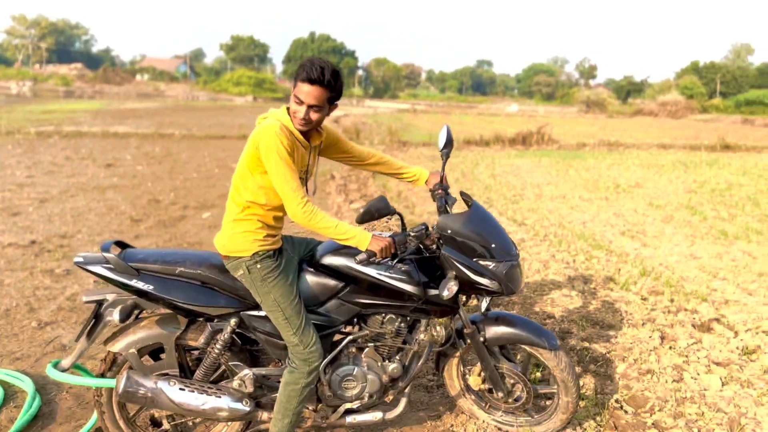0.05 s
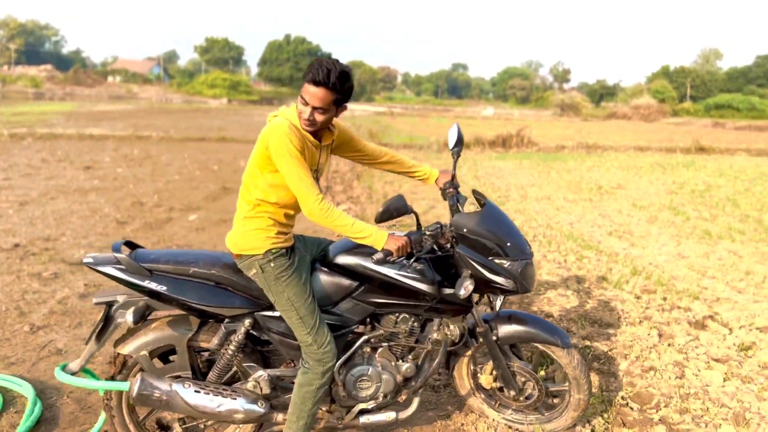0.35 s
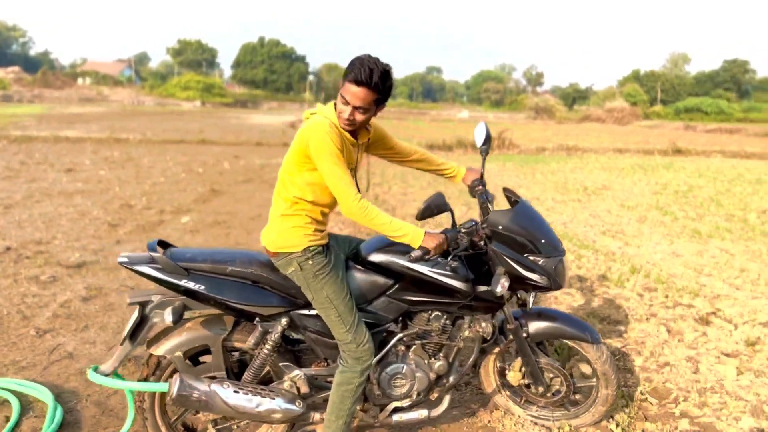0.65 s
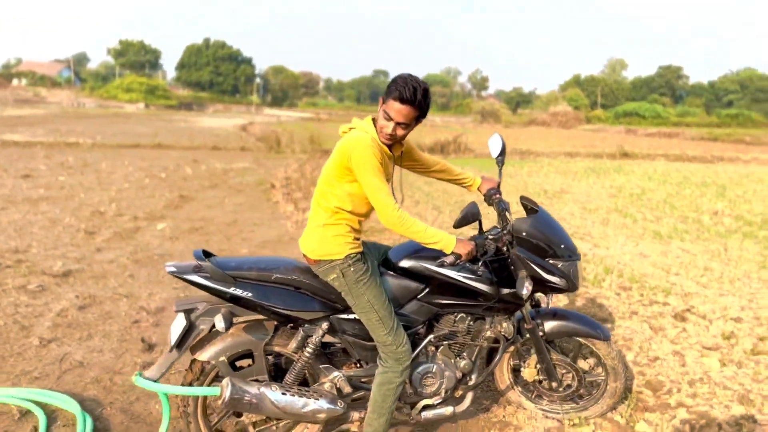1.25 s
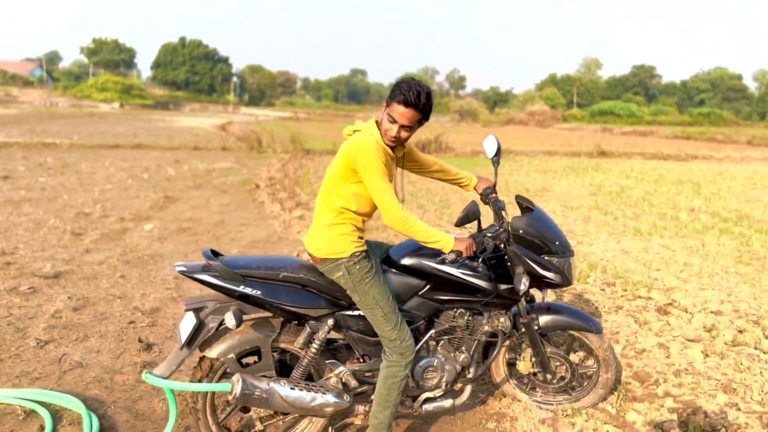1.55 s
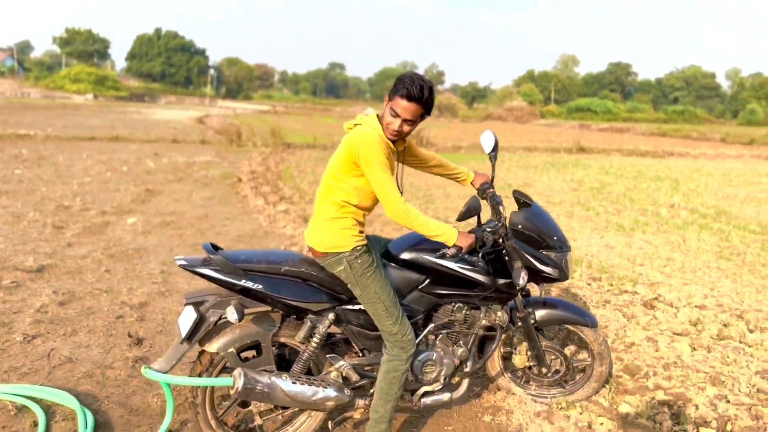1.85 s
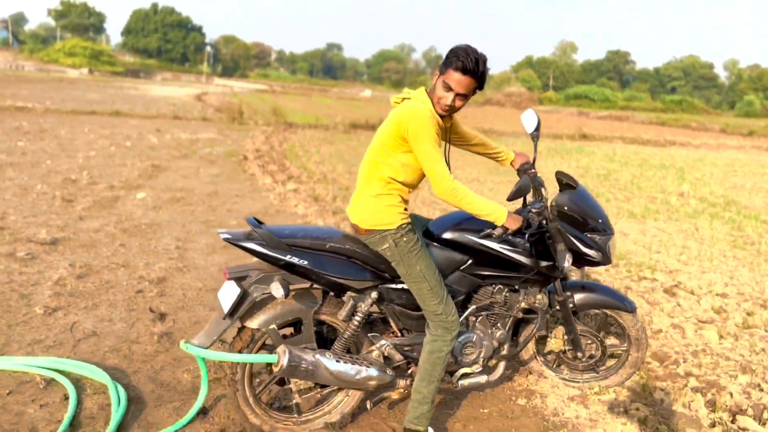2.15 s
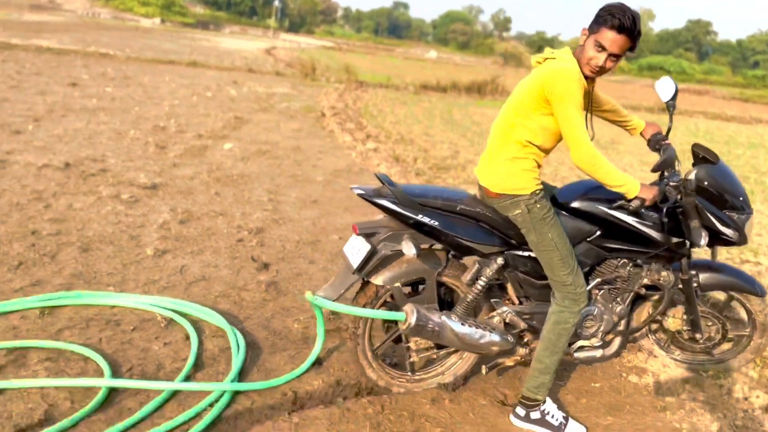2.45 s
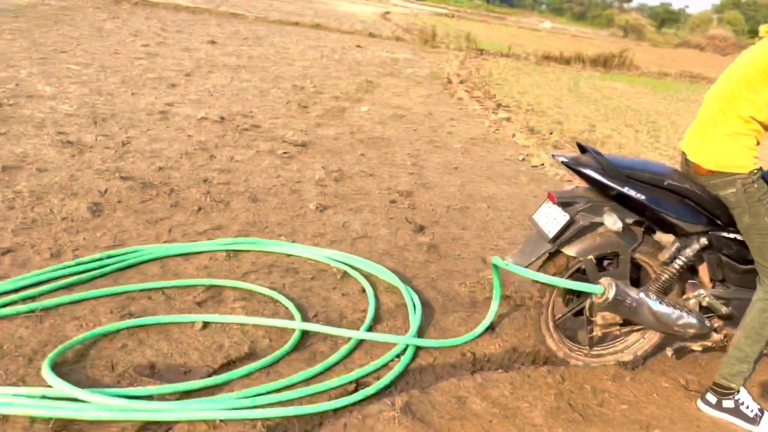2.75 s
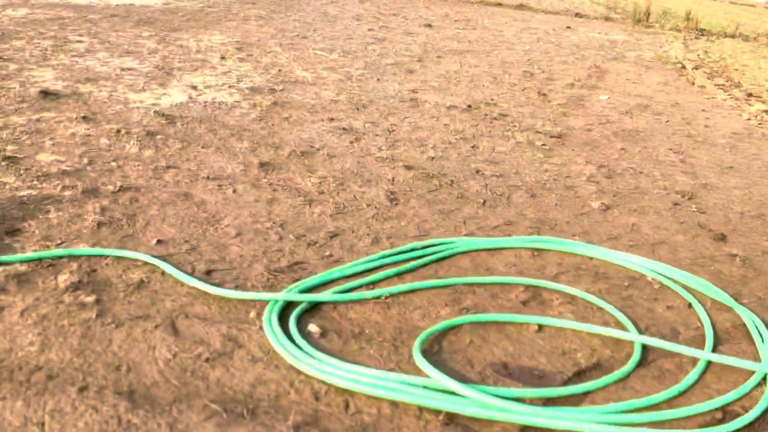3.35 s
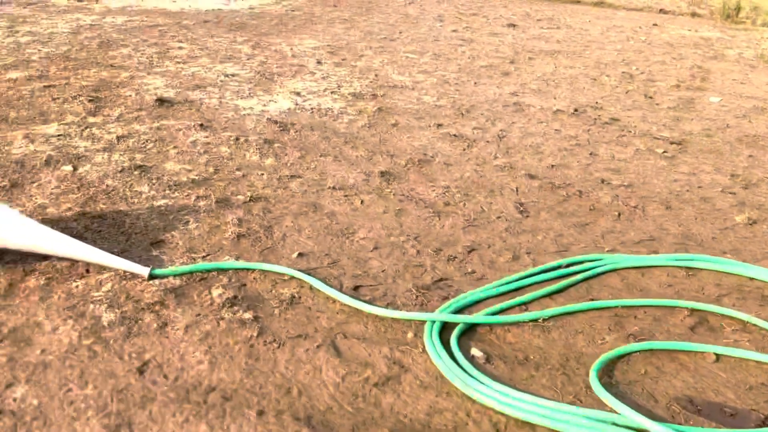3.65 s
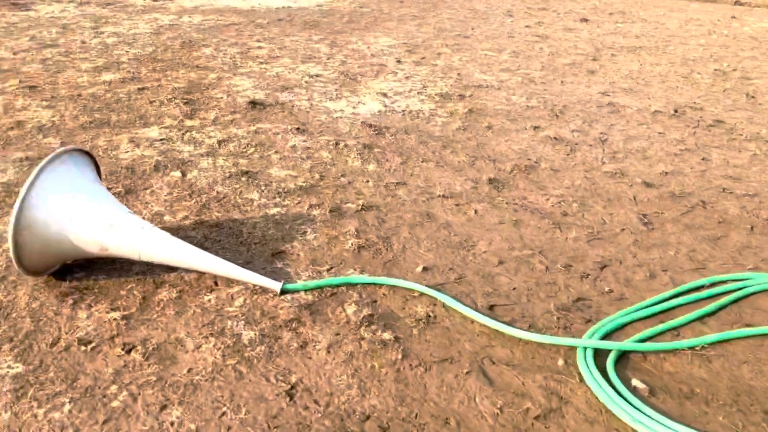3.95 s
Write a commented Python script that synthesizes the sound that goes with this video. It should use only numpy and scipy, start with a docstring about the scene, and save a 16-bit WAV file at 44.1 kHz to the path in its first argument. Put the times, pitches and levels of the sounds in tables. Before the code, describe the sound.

A motorcycle engine runs with uneven pops and low booms, its exhaust piped through a hose.

```python
"""Motorcycle through a garden hose

A single-cylinder engine runs in an open field, its exhaust led through a hose into a horn.
The strokes come out as low booms and falling chirps; throttle blips bring a gulp of air and a
loud pop while the revs sag. On top, the engine clatters, whines, ticks and rings. After 2.4 s
we turn towards the horn, and the clatter slips from beside us to behind us.
Near the end a hollow whistle falls through the hiss."""
import sys
import numpy as np
from scipy import signal
from scipy.fft import rfft, irfft
from scipy.io import wavfile

SR = 44100
rng = np.random.default_rng(int(sys.argv[2]) if len(sys.argv) > 2 else 0)


def inscribe(sig):
    """Save sig as 16-bit PCM at rate SR to the path in sys.argv[1].

    A 1-D sig is mono; a 2-D sig holds one channel per row.
    Samples are clipped to [-1, 1] before scaling.
    """
    pcm = np.round(np.clip(np.atleast_2d(sig).T, -1, 1) * 32767)
    wavfile.write(sys.argv[1], SR, pcm.astype(np.int16))


N = 176400
TIME = np.arange(N) / SR
FREQS = np.maximum(np.fft.rfftfreq(N, 1 / SR), 1)

# engine revs: t/s, cycle rate/Hz
REVS = [(0, 26.8), (.12, 24.6), (.45, 21.4), (.62, 20.1), (.69, 23.3), (.85, 20.8), (1.15, 20.6),
        (1.55, 19.3), (2.1, 18.2), (2.8, 16.5), (4, 16.5)]
# strokes that fire hard: t/s, level/dB
POPS = [(.036, -9), (0.11, -2), (0.191, -7.5), (0.276, -10), (.394, -10), (0.62, -10), (.727, -14),
        (0.761, -1.5), (1.196, -0.5), (1.604, -1.5), (1.858, -12), (1.965, -4.5), (2.011, -2.5),
        (2.379, -1.5), (2.824, -1.5), (3.234, -1.5), (3.591, -4), (3.959, -21)]
# level ride of the soft strokes between them: t/s, level/dB
SOFT_CHIRP_RIDE = [(0, -20.5), (1.5, -18), (2.5, -19), (3, -27), (4, -45)]
# big booms from the horn: peak t/s, level/dB
BOOMS = [(0, -11.5), (.03, -9.5), (.107, -9.5), (.225, -6), (.355, -7), (.49, -8.5), (.7, -6.5), (.765, -6),
         (.808, -7.5), (.855, -5), (.908, -5.5), (1.095, -9.5), (1.155, -9), (1.21, -11.5), (1.26, -5),
         (1.357, -12), (1.562, -3.5), (1.62, -10), (1.669, -6.5), (1.927, -6), (1.973, -4), (2.026, -6),
         (2.08, -5.5), (2.276, -9), (2.342, -5.5), (2.4, -4.5), (2.453, -4), (2.606, -7.5), (2.789, -3.5),
         (2.854, -4.5), (2.908, -6.5), (3.073, -12), (3.206, -5), (3.265, -9.5), (3.49, -11.5),
         (3.558, -7.5), (3.62, -5), (3.948, -9.5)]
# level ride of the soft booms between them: t/s, level/dB
SOFT_BOOM_RIDE = [(.25, -6), (.5, -13), (1.8, -14), (2.6, -11)]
# upper hose resonances: f/Hz, level/dB, rise/s
HOSE_MODES = [(239.3, -27.5, 0.0131), (346.6, -33.5, 0.01824), (567, -46, 0.022)]
# low resonances of hose and horn: f/Hz, level against the boom/dB, rise/s
HORN_MODES = [(70, -14, 0.037), (102.7, -2, 0.023)]
# throttle blips: t/s, rumble push/steps, clatter lift/dB, chuff level/dB
BLIPS = [(0.03, 7.5, -0.5, -22), (0.683, 7.5, 4, -18), (1.116, 8, 3.5, -20), (1.523, 4, 5.5, -25),
         (1.886, 3.5, 7, -34), (2.3, 8, 4.5, -23.5), (2.754, 10, 2, -34), (3.158, 6, 9, -60),
         (3.52, 8, 10.5, -54), (3.957, 10.5, 9.5, -34)]
# tone of the gas rumble: f/Hz, relative level/dB
RUMBLE_EQ = [(20, -22), (38, 10.5), (65, 1.5), (110, 12), (180, 5), (330, -3.5), (550, -16), (1400, -106)]
# clatter rides, beside and behind us: t/s, level/dB
BESIDE_RIDE = [(0, -21.5), (.3, -25), (.55, -27), (.85, -28.5), (1.05, -31), (1.8, -32), (2.1, -30),
               (2.45, -32), (2.8, -36.5), (3.1, -47.5), (4, -67)]
BEHIND_RIDE = [(0, -63), (2.3, -48), (2.8, -36.5), (3.3, -40), (3.8, -41.5), (4, -38.5)]
# clatter tone from each side: f/Hz, relative level/dB
BESIDE_EQ = [(200, 4), (500, 4.5), (850, -3), (1200, 1), (1600, -1), (1850, -4.5), (2900, -5), (3500, -6.5),
             (5200, -12.5), (9800, -21.5), (14000, -23.5)]
BEHIND_EQ = [(450, -0.5), (800, 3), (1550, 1.5), (1850, -7), (2400, -5), (3300, -3.5), (5200, -11),
             (8000, -15.5), (14000, -19)]
# stereo image from each side: f/Hz, left over right/dB, left lead/rad, coherence/0-1
BESIDE_IMAGE = [(500, -1, .5, .75), (740, -8, -.1, .8), (1000, -3, .5, .85), (1560, -5, .7, .88),
                (1710, 1, 0, .85), (2200, -4, .3, .92), (2900, 1, 1.2, .87), (4300, 4, .3, .85),
                (5500, 1, -1, .5), (8400, 0, -3.1, .9), (11500, 0, -6.3, .9)]
BEHIND_IMAGE = [(480, 0, 0, .7), (700, -3, -2.3, .7), (1000, -7, -2.5, .75), (1560, -5, -2.6, .8),
                (1800, 4, -2.5, .4), (3500, 0, -4.9, .75), (6000, 0, -7, .6), (8400, 0, -9.4, .9),
                (11500, 0, -12.6, .9)]
# engine case resonances: f/Hz, width/Hz, lift/dB
CASE_MODES = [(1348, 14, 4), (1494, 23, 5.5), (2080, 160, 3.5), (2780, 87, 4), (6600, 840, 4)]
# gear whine: multiple of the cycle rate, level against the clatter at mean revs/dB
GEAR_PARTIALS = [(54, -18), (86, -18), (121, -16)]
# tone of the intake chuff: f/Hz, relative level/dB
CHUFF_EQ = [(300, 10.5), (1200, 3), (2800, 2.5), (5000, -10), (13000, -15)]
# sharp metal ticks: t/s, level/dB, decay/s
TICKS = [(0.041, -19.5, 0.0051), (0.695, -26, 0.0043), (0.749, -21.5, 0.0037), (0.929, -25.5, 0.0029),
         (1.234, -24, 0.0048), (1.946, -24.5, 0.0089), (2.758, -27.5, 0.01), (3.523, -33, 0.007)]
# tone of the ticks: f/Hz, relative level/dB
TICK_EQ = [(400, 11), (1200, -3.5), (6900, 0.5), (15000, -4)]
# rough rings and, in the last row, a hollow falling whistle:
# peak t/s, half-length/s, f/Hz, glide/(Hz/s), width/Hz, level/dB
RINGS_AND_WHISTLE = [(.29, .13, 1820, -100, 35, -31.5), (.66, .05, 1315, 0, 15, -36),
                     (1.6, .8, 2190, -20, 100, -39.5), (1.5, .9, 4330, -100, 140, -46.5),
                     (1.2, .7, 2880, -60, 70, -42), (3.35, .35, 3550, -750, 300, -48)]


def from_db(db):
    """Decibels to gain."""
    return 10 ** (np.asarray(db) / 20)


def rms_one(x):
    """Scale to rms 1."""
    return x / np.sqrt(np.mean(x ** 2) + 1e-20)


def in_time(rows):
    """A control curve at every sample."""
    return np.interp(TIME, *np.transpose(rows))


def over_hz(rows):
    """Each column of a table at every frequency."""
    hz, *columns = np.transpose(rows)
    return [np.interp(np.log(FREQS), np.log(hz), c) for c in columns]


def noise(gain):
    """Noise with the given gain per frequency; rms 1."""
    return rms_one(irfft(rfft(rng.standard_normal(N)) * gain, N))


def add(out, s, sound):
    """Mix a sound in at a time."""
    start = int(round(s * SR))
    a, b = max(start, 0), min(start + len(sound), N)
    if b > a:
        out[a:b] += sound[a - start:b - start]


def swell(t, peak_s, sharpness):
    """A rounded rise to 1 and a fall."""
    return (t / peak_s * np.exp(1 - t / peak_s)) ** sharpness


def unsteady_tone(turns, width_hz):
    """A tone whose strength and phase wander."""
    narrow = 1 / (1 + (FREQS / width_hz) ** 2)
    return noise(narrow) * np.sin(2 * np.pi * turns) + noise(narrow) * np.cos(2 * np.pi * turns)


def cycles():
    """Engine cycles counted since the start."""
    return np.cumsum(in_time(REVS)) / SR


def beats(accents, soft_ride, jitter_s=.00164, scatter_db=2.5):
    """The engine's rhythm as t/s, level/dB: accents, filled in with loose soft beats at the revs."""
    fills = []
    for (s, _), (until, _) in zip(accents, accents[1:]):
        first, last = np.interp([s, until], TIME, cycles())
        count = max(1, int(round(last - first)))
        fills += list(np.linspace(s, until, count + 1)[1:-1])
    rows = [tuple(beat) for beat in accents]
    for s in fills:
        db = np.interp(s, *np.transpose(soft_ride))
        rows.append((s + jitter_s * rng.normal(), db + scatter_db * rng.normal()))
    return np.array(sorted(rows))


def pipe_resonance(t, hz, db, peak_s, detune=.044, scatter_db=2.36):
    """The air in the pipe swells and dies, a little different in pitch and level each time."""
    tone = np.cos(2 * np.pi * hz * (1 + detune * rng.normal()) * (t - peak_s))
    return from_db(db + scatter_db * rng.normal()) * swell(t, peak_s, sharpness=3.45) * tone


def hose_chirp(t, db, end_hz=193.3, fall_s=.0038):
    """The hose smears a stroke into a falling chirp: the highs arrive first."""
    drop_hz = 538 * from_db(.2 * db)   # softer strokes start lower
    turns = np.cumsum(end_hz + drop_hz * np.exp(-t / fall_s)) / SR
    return -from_db(db) * swell(t, peak_s=.0065, sharpness=4) * np.cos(2 * np.pi * turns)


def exhaust(strokes, booms, right_lag_s=.00009):
    """Each stroke chirps and rings the hose; the lows leave the horn as separate swelling booms."""
    out, t = np.zeros(N), TIME[:SR // 10]
    for s, db in strokes:
        add(out, s, hose_chirp(t, db))
        for hz, mode_db, peak_s in HOSE_MODES:
            add(out, s, pipe_resonance(t, hz, mode_db, peak_s))
    for s, db in booms:
        for hz, mode_db, peak_s in HORN_MODES:
            add(out, s - peak_s, pipe_resonance(t, hz, db + mode_db, peak_s))
    return np.array([out, np.interp(TIME - right_lag_s, TIME, out)])


def throttle(lifts, attack_s, release_s):
    """Each blip opens quickly to its lift and dies away."""
    out = np.zeros(N)
    for (s, *_), lift in zip(BLIPS, lifts):
        opening = np.clip((TIME - s) / attack_s, 0, 1)
        out += lift * opening * np.exp(-np.maximum(TIME - s - attack_s, 0) / release_s)
    return out


def gas_rumble(push, idle_db=-31.5, db_per_step=1.76, side_db=-10.5):
    """A bed of turbulent gas that surges as the throttle opens."""
    colour = from_db(over_hz(RUMBLE_EQ)[0])
    mid, side = noise(colour), from_db(side_db) * noise(colour)
    return from_db(idle_db + db_per_step * push) * np.array([mid + side, mid - side])


def valve_taps(strokes, tap_db=-3.5, scatter_db=2.6, decay_s=.0091):
    """Envelope of the clatter: two valves snap shut in each cycle, over a steady floor."""
    out, t = np.ones(N), TIME[:SR // 10]
    times = strokes[:, 0]
    halfway = (times[1:] + times[:-1]) / 2
    for s in np.concatenate([times, halfway]):
        add(out, s, from_db(tap_db + scatter_db * rng.normal()) * np.exp(-t / decay_s))
    return rms_one(out)


def chain_rattle(clicks_per_s=650, spread_db=2.5, rattle_db=-1):
    """The chain's grit: dense clicks of uneven size over a hiss."""
    sizes = from_db(spread_db * np.minimum(rng.exponential(1, N), 5)) * rng.choice([-1, 1], N)
    clicks = rms_one(sizes * (rng.random(N) < clicks_per_s / SR))
    return rms_one(rng.standard_normal(N) + from_db(rattle_db) * clicks)


def through_case(envelope, eq, image, tones=None):
    """Shaped rattle rings the engine case; any tones join it, and the mix is spread in stereo."""
    case_db = sum(db / (1 + (2 * (FREQS - hz) / width) ** 2) for hz, width, db in CASE_MODES)
    colour = rms_one(from_db(over_hz(eq)[0] + case_db))
    balance_db, lead, coherence = over_hz(image)
    shared = rfft(envelope * chain_rattle()) * colour
    if tones is not None:
        shared += rfft(tones)
    channels = []
    for sign in (1, -1):   # left, right
        direct = np.sqrt(coherence) * shared * np.exp(.5j * sign * lead)
        diffuse = np.sqrt(1 - coherence) * rfft(envelope * chain_rattle()) * colour
        pan = np.sqrt(2 / (1 + from_db(-2 * sign * balance_db)))
        channels.append(irfft(pan * (direct + diffuse), N))
    return np.array(channels)


def gear_whine(db_per_hz=.26):
    """Gear teeth mesh at fixed multiples of the revs and quieten as the engine slows."""
    revs = in_time(REVS)
    mesh = sum(from_db(db) * unsteady_tone(k * cycles(), width_hz=28) for k, db in GEAR_PARTIALS)
    return from_db(db_per_hz * (revs - revs.mean())) * mesh


def intake_gulps(start_hz=285.5, rise_hz_per_s=3960):
    """The intake gives a short rising hoot on each blip, fading as it leaves our side."""
    out, t = np.zeros(N), TIME[:SR // 10]
    turns = np.cumsum(start_hz + rise_hz_per_s * t) / SR
    hoot = swell(t, peak_s=.0076, sharpness=.43) * np.sin(2 * np.pi * turns)
    for s, *_ in BLIPS:
        add(out, s, hoot)
    ride_db = in_time(BESIDE_RIDE)
    return from_db(-23.5 + ride_db - np.median(ride_db)) * out


def intake_chuffs(attack_s=.0025, decay_s=.033):
    """Envelope of the rasp of air as the throttle snaps open."""
    out, t = np.zeros(N), TIME[:SR // 5]
    for s, _, _, db in BLIPS:
        add(out, s, from_db(db) * np.minimum(t / attack_s, 1) * np.exp(-t / decay_s))
    return out


def metal_ticks():
    """Envelope of the bright metal ticks: a hard edge and a tiny tail."""
    out, t = np.zeros(N), TIME[:SR // 10]
    for s, db, decay_s in TICKS:
        add(out, s, from_db(db) * np.exp(-t / decay_s))
    return out


def rings_and_whistle(flutter_hz=18, flutter_db=4):
    """Rough rings and, near the end, a hollow falling whistle in the hiss swell, flutter and fade."""
    out = np.zeros(N)
    slow = 1 / (1 + (FREQS / flutter_hz) ** 4)
    for s, half_length_s, hz, glide, width_hz, db in RINGS_AND_WHISTLE:
        envelope = from_db(db + flutter_db * noise(slow)) * np.exp(-((TIME - s) / half_length_s) ** 2)
        turns = np.cumsum(hz + glide * (TIME - s)) / SR
        out += envelope * unsteady_tone(turns, width_hz)
    return out


def scene():
    """Exhaust in the middle; the engine's clatter crossfades from beside us to behind us."""
    strokes, booms = beats(POPS, SOFT_CHIRP_RIDE), beats(BOOMS, SOFT_BOOM_RIDE)
    taps = valve_taps(strokes)
    _, rumble_pushes, clatter_lifts, _ = np.transpose(BLIPS)
    push = throttle(rumble_pushes, attack_s=.023, release_s=.18)
    lift_db = throttle(clatter_lifts, attack_s=.0031, release_s=.12)
    beside = from_db(in_time(BESIDE_RIDE)) * through_case(taps, BESIDE_EQ, BESIDE_IMAGE, gear_whine())
    behind = from_db(in_time(BEHIND_RIDE)) * through_case(taps, BEHIND_EQ, BEHIND_IMAGE)
    clatter = from_db(lift_db) * (beside + behind)
    top_layer = through_case(metal_ticks(), TICK_EQ, BESIDE_IMAGE, taps * rings_and_whistle())
    intake = intake_gulps() + through_case(intake_chuffs(), CHUFF_EQ, BESIDE_IMAGE)
    return exhaust(strokes, booms) + gas_rumble(push) + clatter + intake + top_layer


def record(dry, low_cut_hz=30, high_cut_hz=14200):
    """Trim the sub bass, soft-clip the loudest pops and cut the very top."""
    dry = signal.sosfilt(signal.butter(2, low_cut_hz, "high", fs=SR, output="sos"), dry)
    rounded = dry / (1 + dry ** 8) ** (1 / 8)
    return signal.sosfilt(signal.ellip(8, .2, 70, high_cut_hz, fs=SR, output="sos"), rounded)


dry = scene()
out = record(dry)
inscribe(out)
```